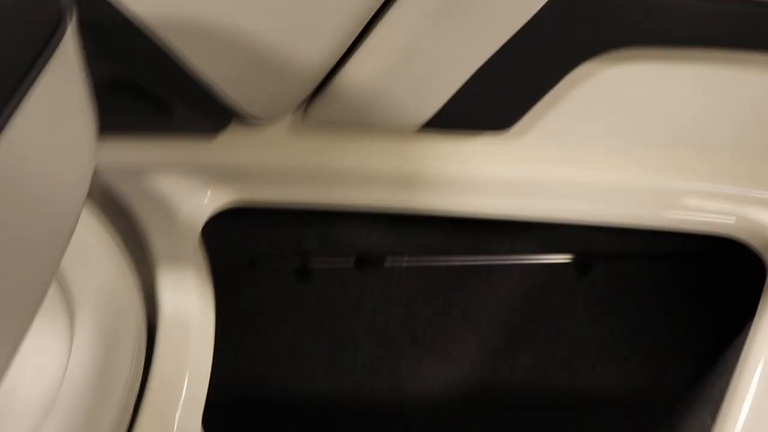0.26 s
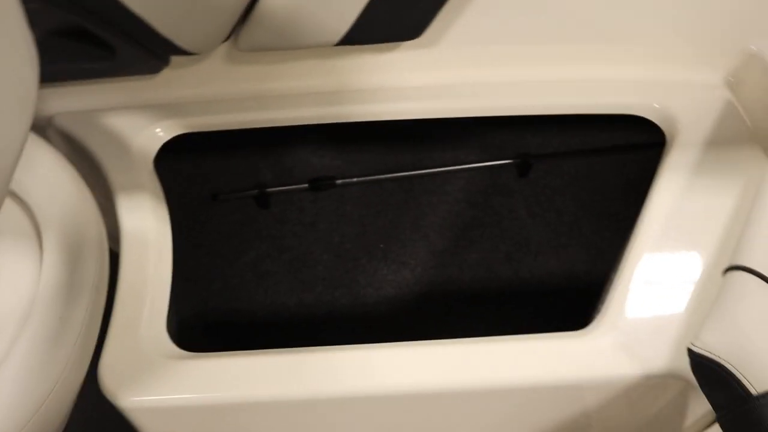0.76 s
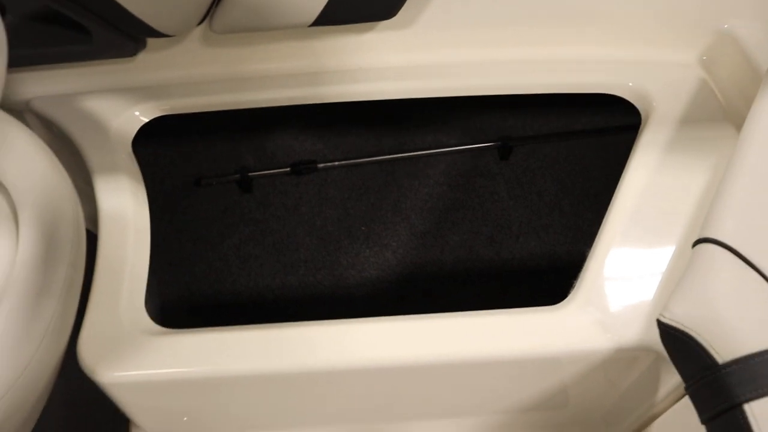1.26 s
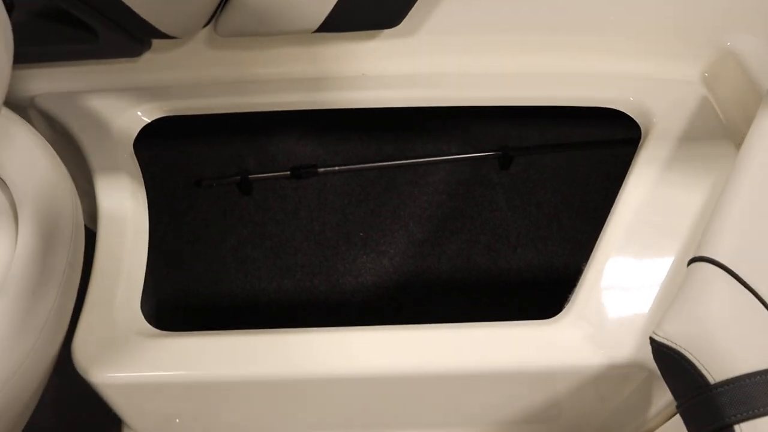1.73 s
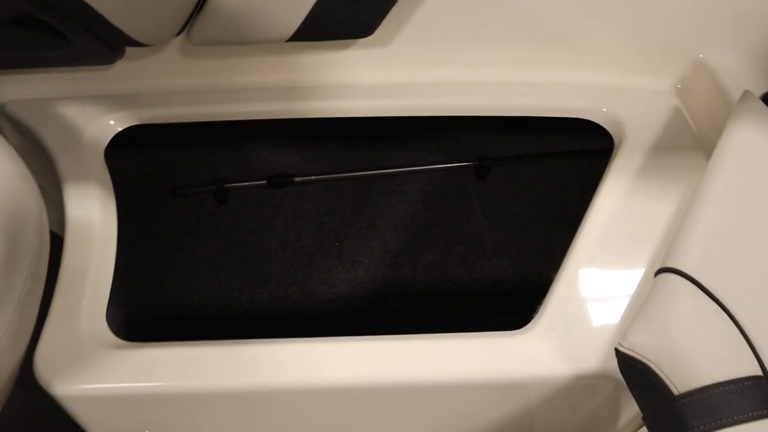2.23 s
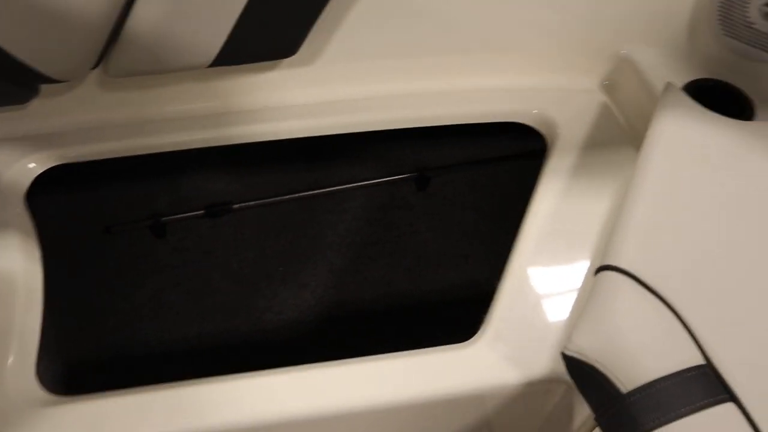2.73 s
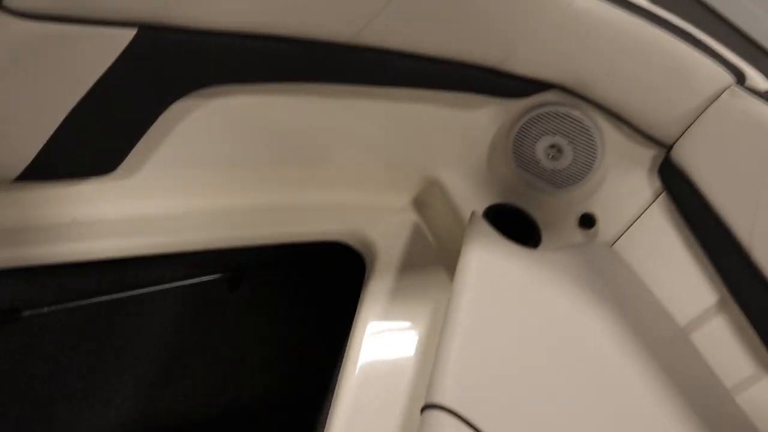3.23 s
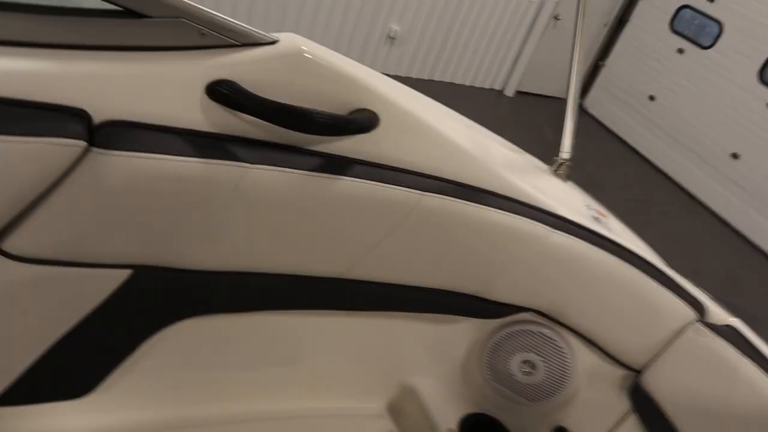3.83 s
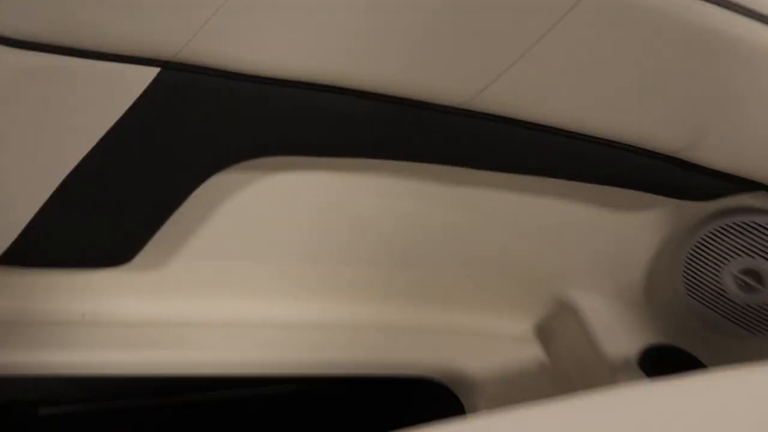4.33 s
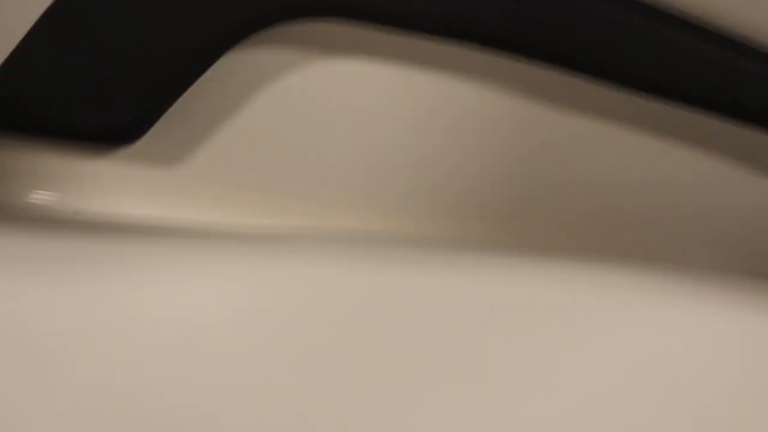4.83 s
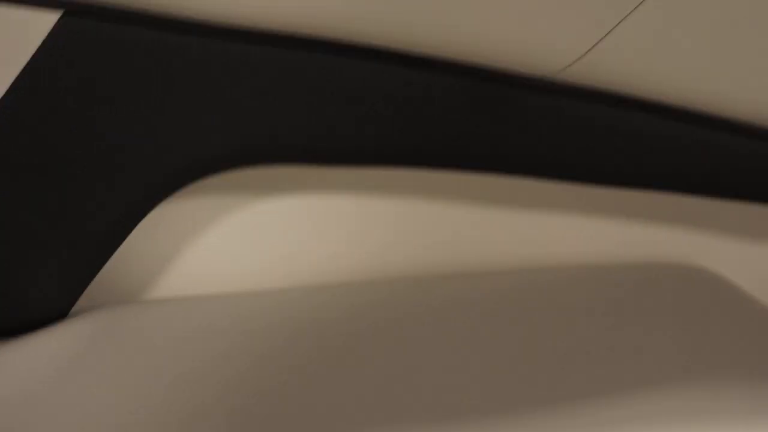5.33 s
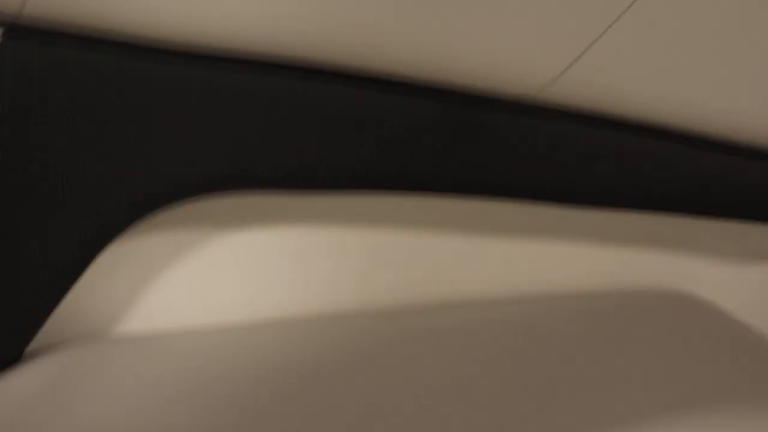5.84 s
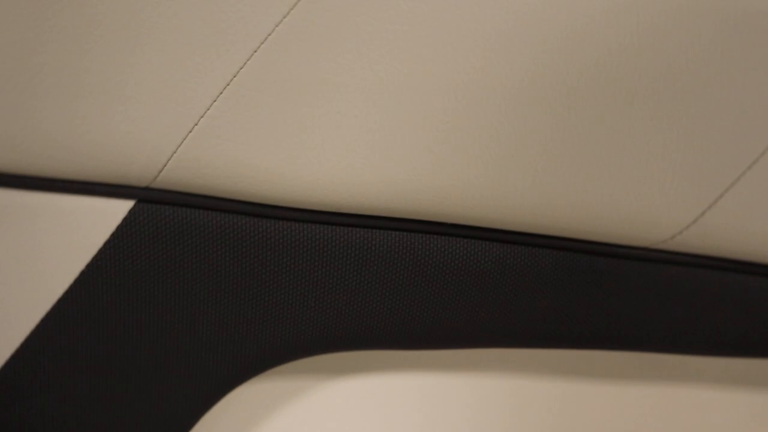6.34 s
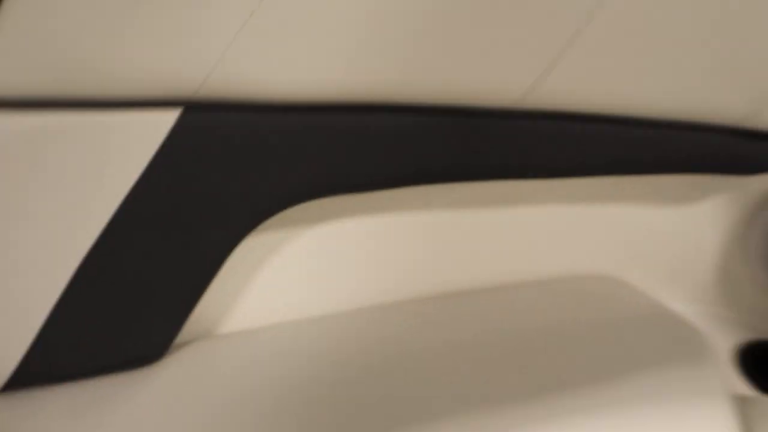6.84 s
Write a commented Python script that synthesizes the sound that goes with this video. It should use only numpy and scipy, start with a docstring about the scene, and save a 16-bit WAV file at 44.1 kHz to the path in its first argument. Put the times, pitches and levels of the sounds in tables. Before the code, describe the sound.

A close stereo microphone hears someone lowering a padded seat over a fibreglass locker. Low ventilation noise with a very thin whine lies behind. An early bump and rustle give way to near stillness, then knocks, scrapes and boomy hull rumble crowd together, a tiny squeak chirps among them, and strong thuds land. Light scuffs and dry ticks end it in the dull decay of a big hall.

```python
"""Lowering a boat seat

Someone lowers an upholstered seat over a locker in a fibreglass boat that stands in a large hall.
Blows excite damped hull modes, shifting weight excites them as dense bumps, vinyl and cloth rub as
banded noise, and one stick-slip squeak rises. Air handling hums far off; the hall adds a dull decay.
Two close ports hear it all, with a difference that grows with pitch."""
import sys
import numpy as np
from scipy import signal
from scipy.fft import rfft, irfft, next_fast_len
from scipy.io import wavfile
from scipy.ndimage import uniform_filter1d

SR = 44100
rng = np.random.default_rng(int(sys.argv[2]) if len(sys.argv) > 2 else 0)


def store_wav(level_fs):
    """Save 16-bit WAV to argv[1]."""
    pcm = np.round(np.clip(np.atleast_2d(level_fs), -1, 1) * 32767)
    wavfile.write(sys.argv[1], SR, pcm.T.astype(np.int16))


N = 312669
T = np.arange(N) / SR


def undb(db):
    """Decibel law: a level as an amplitude ratio."""
    return 10 ** (np.asarray(db) / 20)


def unit(x):
    """Normalisation to an rms of 1."""
    return x / np.sqrt(np.mean(x ** 2))


def colour(x, points):
    """Linear filtering: multiply the spectrum by a curve through (frequency [Hz], level [dB])."""
    hz, db = np.transpose(points)
    size = next_fast_len(N)
    log_hz = np.log(np.arange(size // 2 + 1) * SR / size + 1)
    gain = undb(np.interp(log_hz, np.log(hz), db))
    return irfft(rfft(x, size) * gain, size)[..., :N]


def band(x, lo_hz, hi_hz):
    """Band-pass filtering by a Butterworth resonator chain."""
    return signal.sosfilt(signal.butter(2, [lo_hz, hi_hz], "bandpass", fs=SR, output="sos"), x)


def walk(rate):
    """Slow random modulation: random steps at this rate [Hz], slewed, with an rms of 1."""
    hold = int(SR / rate)
    steps = np.repeat(rng.standard_normal(N // hold + 1), hold)
    return unit(uniform_filter1d(steps, hold)[:N])


def read(tables, count):
    """Envelope interpolation: columns over time; the first count are levels, silent between tables."""
    rows = np.vstack(tables)
    curves = np.array([np.interp(T, rows[:, 0], column) for column in rows.T[1:]])
    inside = np.any([(T >= table[0][0]) & (T <= table[-1][0]) for table in tables], axis=0)
    curves[:count, ~inside] = -120
    return curves


# Side gain for sources close by: (frequency [Hz], level [dB])
NEAR_WIDTH = [(60, -54), (110, -31), (200, -26), (380, -16), (700, -9.5), (1290, -0.5), (2380, 3),
              (4400, 6), (8120, 8), (15000, 5.5)]
# Side gain for the diffuse field of the hall: (frequency [Hz], level [dB])
FAR_WIDTH = [(60, -25), (110, -22), (200, -7), (380, -2.5), (700, 1), (1290, 2), (2380, 3.5), (4400, 6.5),
             (8120, 6), (15000, 8)]


def ports(mid, side, width, pan_db=0):
    """Mid-side decomposition: ports share the mid and differ by a side that grows with pitch."""
    side = colour(side, width)
    return np.array([(mid + side) * undb(pan_db / 2), (mid - side) * undb(-pan_db / 2)])


# Air noise spectrum: (frequency [Hz], relative density [dB per Hz])
AIR_SPECTRUM = [(12, -27), (20, -13), (91, -3), (142, -14.5), (204, -10.5), (347, -17), (422, -17.5),
                (759, -22.5), (1610, -28.5), (1860, -30), (2200, -30), (11800, -52), (16000, -74)]
AIR_DB = -46.5  # mean level of the hiss
WHINE_HZ, WHINE_DB = 1845, -67  # both wander about these centres


def air():
    """Broadband flow noise with a wandering bass, and a thin motor tone that wavers in pitch and level."""
    noise = unit(colour(rng.standard_normal((2, N)), AIR_SPECTRUM))
    bass = band(noise, 36, 270) * 0.023 * walk(8.2)
    noise = noise * undb(.5 * walk(0.86))
    noise = noise + bass
    whine_hz = WHINE_HZ * (1 + .004 * walk(2) + .003 * walk(40))
    whine = np.sin(2 * np.pi * np.cumsum(whine_hz) / SR) * undb(WHINE_DB + 2 * walk(2.5))
    return ports(*(noise * undb(AIR_DB) + whine), FAR_WIDTH)


# Hull and locker modes: (frequency [Hz], level [dB], full 60 dB decay time [s])
HULL_MODES = [(40.4, -6, 0.92), (54.8, -5, 0.41), (85.2, 10, 0.1), (105.2, 5.5, 0.26), (128.3, 1, 0.51),
              (159, 8, 0.091), (190, 2.5, 0.2), (226, 2.5, 0.13), (287.2, 0, 0.19), (352.3, -3.5, 0.14),
              (390, 7.5, 0.019), (505, -1.5, 0.086), (661, 5, 0.037), (801, 3.5, 0.052), (895, -8, 0.094),
              (1307, -4, 0.047), (1484, -17, 0.11), (1890, -9, 0.033)]
HULL_HZ = np.array(HULL_MODES)[:, 0]


def ring(t, ring_share, detune=1):
    """Modal superposition: one exponentially damped sine a row, at a share of the full decay time."""
    hz, db, t60 = np.array(HULL_MODES).T[:, :, None]
    decay = undb(db - 60 * t / (t60 * np.clip(ring_share, .1, 3)))
    return decay * np.sin(2 * np.pi * hz * detune * t)


# Weight shifting on the deck, one list a spell:
# (time [s], level at the place [dB], place: 0 hull boom, 1 deck, 2 panels)
WEIGHT_SHIFTS = [
    [(0, -24, 0.78), (.18, -40.5, 1), (.394, -45, 0.47)],
    [(.396, -23, 0.46), (.52, -22, 0), (.59, -32.5, 1), (.67, -35, 0.11), (.9, -38.5, 0.29),
     (1.07, -46, 0.65), (1.4, -49.5, 0.7)],
    [(2.6, -46.5, 1.23), (2.88, -54.5, 1.45), (3.4, -55, 1.64), (3.67, -54, 0.68), (3.85, -49, 1.2)],
    [(3.9, -32, 1.15), (3.96, -30.5, 1.4), (4.08, -32.5, 1.7), (4.24, -29.5, 1.4), (4.41, -22.5, 1.22),
     (4.58, -29, 1.6), (4.72, -23, 1.1), (4.83, -32.5, 1.35), (5, -33, 1.1), (5.09, -15.5, 1.58),
     (5.16, -29.5, 1.2), (5.24, -31, 2.6), (5.34, -31.5, 0.2), (5.47, -41, 0.75), (5.64, -34, 1.17),
     (5.82, -32, 1.56), (5.87, -36.5, 0.14), (6.07, -48, 0.67)],
    [(6.075, -48, .8), (6.12, -26, 1.1), (6.2, -28, 0.6), (6.25, -25.5, 0.66), (6.34, -32, 1.2),
     (6.51, -24, 1.43), (6.61, -25.5, 0.98), (6.82, -40, 1.5), (6.96, -40.5, 1.47), (7.09, -47, 1.45)],
]
PLACE_DB = 14.5  # loss of a mode group one step from the place; grows as the distance squared


def weight():
    """Random impulsive excitation: dense uneven bumps drive three groups of hull modes below 450 Hz."""
    struck = rng.random((2, N)) < 300 / SR  # 300 bumps a second on average
    bumps = rng.standard_normal((2, N)) * struck * undb(2.0 * rng.exponential(size=(2, N)))
    modes = ring(T[:SR // 2], .5)
    group = np.digitize(HULL_HZ, [70, 170, 450])
    db, place = read(WEIGHT_SHIFTS, count=1)
    out = 0
    for k in range(3):
        members = modes[group == k]
        tap = members[::2].sum(axis=0) - members[1::2].sum(axis=0)  # neighbours in opposite phase
        rumble = unit(signal.fftconvolve(bumps, tap[None])[:, :N])
        out = out + undb(db - PLACE_DB * (place - k) ** 2) * rumble
    return ports(*out, NEAR_WIDTH)


SHUFFLE_HZ, SHUFFLE_ENDS_S = (1850, 2750), .36
SHUFFLE_DB, SHUFFLE_FADE_DB_PER_S = -51, 12  # level at the start, and its fall


def shuffle():
    """Narrow-band noise, perhaps cloth dragging, fades and stops."""
    hiss = unit(band(band(rng.standard_normal((2, N)), *SHUFFLE_HZ), *SHUFFLE_HZ))
    level = undb(SHUFFLE_DB - SHUFFLE_FADE_DB_PER_S * T + 1.3 * walk(29))
    ending = np.clip((SHUFFLE_ENDS_S - T) / 0.061, 0, 1)
    return ports(*(hiss * level * ending), NEAR_WIDTH)


SIDES = np.array([.5, -.5])[:, None]  # left and right share of a level difference
# Strokes of cloth and vinyl, levels before catching: (loudest time [s], rise [ms], fall [ms],
# band 2 level [dB], bands 1, 3 and 4 over band 2 [dB], left minus right [dB])
SLIDE_STROKES = [(0.05, 230, 160, -54, 7, -17, -23, -1), (.25, 230, 850, -55.5, 2.5, -9, -16, -0.5),
                 (0.429, 41, 72, -40, 6.5, -7, -2.5, 0.5), (0.591, 42, 70, -47.5, 2, -3, -4.5, -1),
                 (.68, 185, 49, -43.5, -5, -6, -32, 0.5), (.95, 200, 180, -61.5, 9.5, -3.5, -11.5, -1),
                 (2.922, 91, 100, -76, 20, 9.5, 9, -2), (3.15, 820, 790, -62.5, 8.5, -8, -10.5, 1.5),
                 (3.909, 4.1, 33, -40, 7, -5, 0, 5), (3.955, 39, 22.4, -51, 14.5, 2, 9, 3),
                 (4, 36, 38, -57, 0, -6, -10, 2), (4.09, 40, 29, -63.5, 4, 1, 1, 2),
                 (4.22, 76, 50, -58, 14, -9, -24, 5), (4.362, 43, 34, -39, 1, -1.5, -2.5, -3),
                 (4.47, 29, 1400, -44, -1, -6, -36, 0), (4.861, 176, 120, -38.5, -3.5, 1, -16, -3),
                 (5, 185, 125, -40.5, 4.5, 6.5, 9, -2.5), (5.11, 98, 92, -35, 9, -3, -5, 2.5),
                 (5.24, 84, 260, -50, 3, -5.5, -9.5, 1), (5.481, 33, 106, -37.5, -6, -2, -5.5, 1),
                 (5.559, 90, 61, -40, 12.5, -5, -17, 0), (5.69, 82, 60, -38.5, 5, -6, -13, 0.5),
                 (5.798, 110, 90, -44, 5.5, -6, -13.5, 1), (5.95, 210, 690, -52, -1.5, -10.5, -18, 0),
                 (6.13, 66, 154, -40.5, 6, -5.5, -14.5, -1), (6.32, 92, 120, -40.5, 5, -10, -15, -4),
                 (6.48, 100, 103, -42, 7, -8.5, -14.5, -2), (6.76, 71, 410, -48, 0.5, -8.5, -15, -3),
                 (7.03, 150, 170, -58.5, -3, -8, -13, -3)]
# Common unevenness of bands 1 to 4: (spread [dB])
COMMON_CATCH = [0.71, 0.72, 1, 1.2]
# Independent unevenness of bands 1 to 4: (spread [dB])
OWN_CATCH = [2.3, 1.6, 1.3, 2.2]
STROKE_EDGE_DB = -13  # level one rise before and one fall after the loudest moment
CREEP_DB, CREEP_TILT_DB = -27.5, -6.5  # creep in band 2 over the weight level, and change a band upward


def slide_power():
    """Sliding friction: creep follows the weight, strokes swell and fall, and both catch unevenly."""
    step = np.arange(-1, 3)[:, None, None]  # bands from band 2
    creep_db = read(WEIGHT_SHIFTS, count=1)[0] + CREEP_DB + CREEP_TILT_DB * step
    power = undb(creep_db + 0 * SIDES) ** 2  # bands x sides x time
    for s, rise_ms, fall_ms, db, low_db, high_db, top_db, pan_db in SLIDE_STROKES:
        near = slice(max(int((s - rise_ms / 500) * SR), 0), int((s + fall_ms / 500) * SR))
        flank_ms = np.where(T[near] < s, rise_ms, fall_ms).clip(5)
        away = 1000 * (T[near] - s) / flank_ms
        bands_db = np.array([low_db, 0, high_db, top_db])[:, None, None]
        power[:, :, near] += undb(db + STROKE_EDGE_DB * away ** 2 + bands_db + SIDES * pan_db) ** 2
    common = np.outer(COMMON_CATCH, walk(120))
    own = np.array([spread_db * walk(70) for spread_db in OWN_CATCH])
    return power * undb(common + own)[:, None] ** 2


# Scuffs of vinyl on gelcoat: (time [s], band 2 level [dB], band 1 over band 2 [dB],
# band 4 over band 2 [dB], left minus right [dB], hold including the rise [ms])
VINYL_SCUFFS = [(0.081, -49, -20, -16, 2, 17), (0.393, -40, 11.5, 3.5, -2.5, 15.5),
                (0.428, -32, 10, -40, -2.5, 19), (2.118, -53, 9.5, -8, -1, 9.6),
                (2.635, -76, 25, 16.5, 9, 2.3), (3.025, -50, -14, -42, 2, 27),
                (3.9028, -25, 4.5, -1, 4, 0.9), (4.037, -51, 9, -23, -1, 3.3), (4.09, -53, 11.5, -16, 4, 4),
                (4.188, -47, 19.5, -8, 3, 16.4), (4.266, -38.5, 4, -9, -6, 37),
                (4.284, -22, 0.5, -14, -6, 3.1), (4.291, -26, -2, -10, 0, 2), (4.295, -32, 4, -11, 2, 9),
                (4.401, -18, 0.5, -17.5, 8, 2.9), (4.411, -32, 3, -25, 2, 5),
                (4.488, -19, -15, -30, 3, 3.1), (4.497, -37, -8, -21, 5, 4.2),
                (4.708, -33, -3.5, -14.5, 1, 7.8), (4.724, -38, 6, -36, 1.5, 23),
                (5.074, -28.5, -19, -1, 4, 4.3), (5.109, -35, 3, -12, 4, 1.5), (5.148, -35, 5, -15, 2, 2),
                (5.135, -37.5, 9, -23, 14, 16), (5.186, -29, -6, -8, -8, 1.8),
                (5.236, -38, 3, -29, 6.5, 14), (5.383, -36.5, 10.5, -13, 2.5, 31),
                (5.405, -27.5, -6, -9, 0.5, 33), (5.522, -31, 7, -4, -1, 2.9),
                (5.561, -6.5, -1, -23, 3.5, 2.6), (5.577, -33.5, 11, 2, -4, 2),
                (5.67, -42.5, 14, -18, 6.5, 45), (6.075, -12.5, -5, -5.5, 0, 1.86),
                (6.114, -38, 20, -35, -7, 2.1), (6.151, -29.5, 5.5, -14, 1.5, 11.5),
                (6.168, -33, 10.5, -20, -3, 5.6), (6.231, -38, 5, -26, 0, 2.9),
                (6.302, -39, 6, -10, -2.5, 28), (6.369, -45, 7, -5, -1, 19), (6.403, -47, 3, -5, -2, 21),
                (6.447, -49, 1, 1, -3, 7.3), (6.472, -36, 10, -9, -6, 0.9), (6.508, -26, -7, -33, -6.5, 13),
                (6.517, -11, 2, -14, -2, 3.5), (6.704, -42.5, 8, -8.5, -3, 18), (6.762, -40, 8, -5, -2, 3),
                (6.778, -50, 18, 3, -2, 2.2), (6.823, -39.5, -7, -25, -3, 2.7), (6.898, -48, 0, -26, 0, .6),
                (6.909, -45, -5, -22, 1, .6), (6.922, -45, 1, -19, 3.5, .6), (6.936, -43, 10, -5, -1, 0.5),
                (6.967, -39, -5, -20, 0, .6), (6.973, -35.5, 3, -17, -4, 2.2),
                (7.003, -44, -10.5, -18, 2, 1), (7.016, -39, -5, -16, -12, .6),
                (7.044, -36.5, 4, -13, -2, .8), (7.064, -47, 1.5, -9, 1, 3.5)]
SCUFF_RISE_MS = 3.2
SCUFF_FADE_MS, FADE_PER_HOLD = 14.4, 0.82  # 60 dB fade without a hold; extra fade per hold time
THIRD_BAND_SHARE = 0.29  # band 3 over band 2, as a share of band 4 over band 2


def scuff_power(power):
    """Transient friction: each scuff rises, holds and decays exponentially, adding to the power."""
    for s, db, low_db, top_db, pan_db, hold_ms in VINYL_SCUFFS:
        at = int(s * SR)
        ms = T[:min(SR // 6, N - at)] * 1000
        fade_ms = SCUFF_FADE_MS + FADE_PER_HOLD * hold_ms
        fade = undb(-60 * np.maximum(ms - hold_ms, 0) / fade_ms)
        shape = np.clip(ms / SCUFF_RISE_MS, 0, 1) * fade
        bands_db = np.array([low_db, 0, THIRD_BAND_SHARE * top_db, top_db])[:, None, None]
        power[:, :, at:at + len(ms)] += (undb(db + bands_db + SIDES * pan_db) * shape) ** 2
    return power


# Rubbing hiss spectrum: (frequency [Hz], relative density [dB per Hz])
RUBBING_SPECTRUM = [(180, 13), (300, 14.5), (433, 6.5), (870, 4), (946, 2.5), (1210, -1.5), (1620, -5),
                    (2070, -8), (2650, -11), (2950, -11.5), (3700, -15), (7320, -22.5), (11500, -22.5),
                    (14700, -37.5), (16000, -54)]
# Rubbing bands 1 to 4: (lower edge [Hz], upper edge [Hz])
RUBBING_BANDS = [(400, 1500), (1500, 3200), (3200, 7000), (8500, 17000)]


def friction():
    """Friction noise: slides and scuffs set the power of four bands of random asperity hiss."""
    power = scuff_power(slide_power())
    out, hiss = 0, colour(rng.standard_normal((2, N)), RUBBING_SPECTRUM)
    for k, (lo, hi) in enumerate(RUBBING_BANDS):
        # each band hears another stretch of the hiss, so that they add without cancelling
        band_hiss = unit(band(np.roll(hiss, k * SR, axis=1), lo, hi))
        out = out + np.sqrt(power[k]) * ports(*band_hiss, NEAR_WIDTH)
    return out


# Blows: (time [s], peak of the mid before its closing fade [dB], settled pitch of the struck spot [Hz],
# spread of the modes woken [octaves], boom under 70 Hz [dB], share of the full decay time [ratio])
HULL_BLOWS = [(0.06, -28, 125, 0.3, -16, 0.85), (0.396, -26, 424, 1.1, -14.5, 0.72),
              (0.43, -16, 750, .8, -20, 1.1), (0.447, -17, 680, .5, -30, 1), (0.444, -9, 154, 1.5, 13, 1.3),
              (0.5, -20.5, 103, 0.8, -1, 0.14), (0.878, -34, 112, 0.69, -14, 0.91),
              (0.951, -29.5, 131, 1.1, -4, 1.6), (2.114, -35.5, 159, 0.47, -14, 1.3),
              (2.231, -36.5, 180, 1.4, -6, 0.96), (3.93, -17, 334, 0.45, -20, 0.54),
              (3.954, -18, 310, 0.23, -18, 1.1), (4.036, -18, 173, 0.7, -14, 0.87),
              (4.087, -15.5, 190, 0.62, -11, 0.99), (4.191, -23, 1300, 0.38, -30, 0.87),
              (4.197, -8.5, 820, 0.96, -30, 1.47), (4.208, -22, 1000, .4, -30, 1.5),
              (4.193, 0.5, 280, 0.69, 1, 0.12), (4.195, -8, 610, 0.98, -27, 0.67),
              (4.205, -4, 127, 0.87, -15, 1.2), (4.226, -12, 258, 0.44, -30, 0.56),
              (4.223, -16, 114, 0.28, -20, 1), (4.283, -8.5, 264, 0.41, -2, 0.54),
              (4.402, -1.5, 181, 1, -19, 0.35), (4.412, -17.5, 636, 0.41, -30, 0.89),
              (4.416, -15, 306, .4, -30, 0.63), (4.43, -17, 260, 0.46, -30, 0.69),
              (4.444, -12.5, 129, 0.12, -35, 1), (4.489, -3.5, 190, 0.87, -27, 0.34),
              (4.5, -13, 320, 0.35, -30, 0.25), (4.52, -12, 126, 0.19, -30, 1.2),
              (4.573, -12.5, 129, 0.25, -31, 2.2), (4.708, -20.5, 505, 0.25, -25, 1.1),
              (4.712, -18.5, 152, 0.65, -12, 0.51), (4.731, -31, 495, 0.34, -32.5, 0.8),
              (4.982, -8.5, 225, 0.84, -6, 1), (4.994, -13, 200, 0.57, -20, 0.45),
              (5.042, -21, 730, 0.46, -30, 0.94), (5.054, -19, 800, 0.36, -22, 1),
              (5.073, -20, 227, 1.1, -11, 0.83), (5.079, -17, 300, 0.88, -20, 0.48),
              (5.092, -18, 380, 0.62, -20, 0.35), (5.1, -28, 600, 0.66, -30, .5),
              (5.119, -12, 260, 0.55, -20, 0.43), (5.107, -16, 244, 0.6, -12, 0.59),
              (5.14, -9, 135, 0.41, -19, 0.44), (5.146, -22, 260, 0.92, -20, 0.45),
              (5.15, -22, 950, .4, -30, 0.48), (5.222, -16, 197, 0.41, -12, 0.42),
              (5.229, -21, 950, 0.26, -26, 0.52), (5.239, -23.5, 745, 0.94, -31, 0.73),
              (5.249, -26.5, 260, 0.66, -20, 0.69), (5.272, -19.5, 248, 0.43, -22.5, 0.52),
              (5.4, -16.5, 226, 0.21, -23, 0.79), (5.508, -12, 134, 0.62, -18, 1.3),
              (5.565, -9.5, 230, 1.5, 1, 0.76), (5.566, -9.5, 794, 1.1, -30, 0.55),
              (5.588, -18.5, 133, 1.1, 9, 1.1), (5.638, -16, 108, 0.34, -17, 1.1),
              (6.0757, 2, 203, 0.54, -14, 0.26), (6.107, -11, 328, 0.6, -20, 0.09),
              (6.116, -23, 2000, 0.18, -30, 0.9), (6.116, -14.5, 935, .7, -20, 0.24),
              (6.149, -6.5, 139, 0.62, -18, 0.38), (6.158, -1.5, 110, 0.49, 26, 0.34),
              (6.171, -6.5, 140, 0.73, -18, 0.12), (6.172, -12, 474, 0.45, -30, 0.47),
              (6.178, -15, 250, .5, -30, 0.15), (6.214, -22, 1200, .7, -30, 0.52),
              (6.212, -12.5, 180, 0.57, -29, 0.2), (6.232, -18.5, 200, 0.69, -20, .3),
              (6.272, -18, 150, .5, -20, 0.18), (6.294, -29, 500, .9, -30, 0.23),
              (6.307, -12.5, 224, 0.088, -7, 1.2), (6.365, -17, 187, 0.51, -20, 0.81),
              (6.511, -12, 210, 0.39, -5, 0.99), (6.525, -1.3, 191, 0.37, 22, 0.15),
              (6.708, -23, 238, 0.18, -5, 1.5), (6.763, -32.5, 350, 0.74, -20, .5),
              (6.781, -33, 300, 0.88, -20, 0.46), (6.823, -31.5, 297, 0.68, -20, 0.55),
              (6.974, -29.5, 467, 0.55, -19.5, 1.2)]
LOAD_DETUNE = .03  # spread: hands and cushion shift the upper modes from blow to blow
FLEX_DB, FLEX_CYCLES = 9, 3.83  # struck spot: drive against the hull, cycles to fall 60 dB
FLEX_RISE_CYCLES = 0.36  # soft contact: the swing builds up first
SAG, SAG_S = 0.37, 0.0048  # the flexing starts sharp by this share and slackens with this time constant


def blows():
    """Impact excitation: the struck spot flexes briefly and wakes hull modes near its pitch, and boom.
    The ports differ in the sign of each mode."""
    t, out = T[:SR // 2], np.zeros((2, N + SR))
    draws = rng.standard_normal((len(HULL_BLOWS), 2, len(HULL_MODES)))
    signs, loads = np.sign(draws[:, 0]), draws[:, 1]
    slack = t + SAG * SAG_S * (1 - np.exp(-t / SAG_S))
    swing = (-1) ** np.arange(len(HULL_MODES))  # neighbours swing against each other
    for (s, db, spot_hz, spread, boom_db, ring_share), sign, load in zip(HULL_BLOWS, signs, loads):
        octaves = np.log2(HULL_HZ / spot_hz)
        woken = np.exp(-.25 * (octaves / max(spread, .1)) ** 2)
        woken = woken + undb(boom_db) * (HULL_HZ < 70)
        cycles = spot_hz * slack
        flex = undb(FLEX_DB - 60 * cycles / FLEX_CYCLES) * np.sin(2 * np.pi * cycles)
        flex = flex * (1 - np.exp(-cycles / FLEX_RISE_CYCLES))
        detune = 1 + LOAD_DETUNE * (load * (HULL_HZ > 140))[:, None]
        modes = np.array([swing * woken, sign * woken]) @ ring(t, ring_share, detune)
        both = modes / np.sqrt(np.sum(woken ** 2)) - flex
        at = int(s * SR)
        out[:, at:at + len(t)] += both * (1 - t / t[-1]) * undb(db) / np.abs(both[0]).max()
    return ports(*out[:, :N], NEAR_WIDTH)


# Squeak harmonics from the fundamental up, before flicker: (level [dB])
SQUEAK_HARMONICS = [0, -2, -6, -9, -12, -14, -16]
# What the seat passes of the squeak: (frequency [Hz], level [dB])
SEAT_RESPONSE = [(300, -18), (760, 4.5), (1050, -5.5), (1580, 5), (1900, -4.5), (2500, -23), (3000, 4),
                 (3300, -17), (3600, -1.5), (4200, -19), (4900, -1), (5400, -8), (8000, -9), (12000, -34)]
SQUEAK_S, SQUEAK_HOLD_S = 5.407, 0.029
SQUEAK_DB, SQUEAK_FADE_DB_PER_S = -13.5, 1700  # drive before the seat response, fade after the hold
SLIPS_FROM_HZ, SLIPS_TO_HZ, QUICKEN_S, SLIPS_SAG_HZ_PER_S = 690, 1880, .031, 6000
OVERTONES_FLICKER_DB, SLIPS_ALTERNATE = 3, .3


def squeak():
    """Stick-slip oscillation: slips quicken into a rising tone with broken overtones, then sag and fade.
    It is rough in size and timing and slightly to the left."""
    t = T - SQUEAK_S
    quick = np.sin(np.pi / 2 * np.clip((t - .003) / QUICKEN_S, 0, 1))
    sag_hz = SLIPS_SAG_HZ_PER_S * np.clip(t - QUICKEN_S, 0, .05)
    hz = SLIPS_FROM_HZ + (SLIPS_TO_HZ - SLIPS_FROM_HZ) * quick - sag_hz
    phase = 2 * np.pi * np.cumsum(hz * (1 + .045 * walk(900))) / SR
    fade_db = SQUEAK_FADE_DB_PER_S * np.maximum(t - SQUEAK_HOLD_S, 0)
    size = np.clip(t / .003, 0, 1) * undb(SQUEAK_DB - fade_db + 2.2 * walk(600))
    sizes = []
    for k, db in enumerate(SQUEAK_HARMONICS):
        flicker_db = OVERTONES_FLICKER_DB * (k > 0) * (walk(200) - 1.5)  # also lowers the overtones
        sizes.append(size * undb(db + flicker_db))
    uneven = 1 + SLIPS_ALTERNATE * np.cos(phase / 2)  # strong and weak slips take turns

    def tone(lead):
        harmonics = sum(a * np.sin((k + 1) * phase + lead) for k, a in enumerate(sizes))
        return colour(uneven * harmonics, SEAT_RESPONSE)

    return ports(tone(0), tone(.8), NEAR_WIDTH, 0.54)  # side leads by 0.8 rad


HALL_T60_S, HALL_DB, HALL_HZ = 0.52, -26, 2700  # decay before the low-pass, level, low-pass cutoff


def hall(x):
    """Diffuse reverberation: convolution with low-passed, exponentially decaying noise."""
    t = np.arange(SR) / SR
    tail = rng.standard_normal((2, SR)) * undb(-60 * t / HALL_T60_S) * np.clip(t / 0.0022, 0, 1)
    tail = signal.lfilter(*signal.butter(1, HALL_HZ, fs=SR), tail)
    tail = tail / np.sqrt(np.sum(tail[0] ** 2))
    wet = signal.fftconvolve(tail, x.mean(axis=0)[None])[:, :N]
    return ports(*(undb(HALL_DB) * wet), FAR_WIDTH)


def scene():
    """Superposition: the boat's sounds, their reverberation and the distant air."""
    boat = weight() + shuffle() + friction() + blows() + squeak()
    return air() + boat + hall(boat)


MIC_LOW_HZ, TOP_HZ = 29.6, 16000


def record(dry):
    """Band limiting and clipping: capsules lose the deepest bass, peaks stop at full scale, top is cut."""
    heard = signal.sosfilt(signal.butter(2, MIC_LOW_HZ, "highpass", fs=SR, output="sos"), dry)
    clipped = np.clip(heard, -1, 1)
    return signal.sosfilt(signal.ellip(8, .2, 60, TOP_HZ, fs=SR, output="sos"), clipped)


dry = scene()
out = record(dry)
store_wav(out)
```